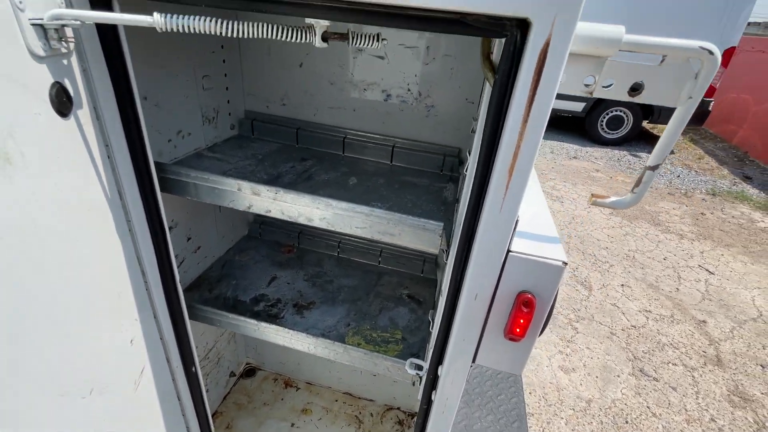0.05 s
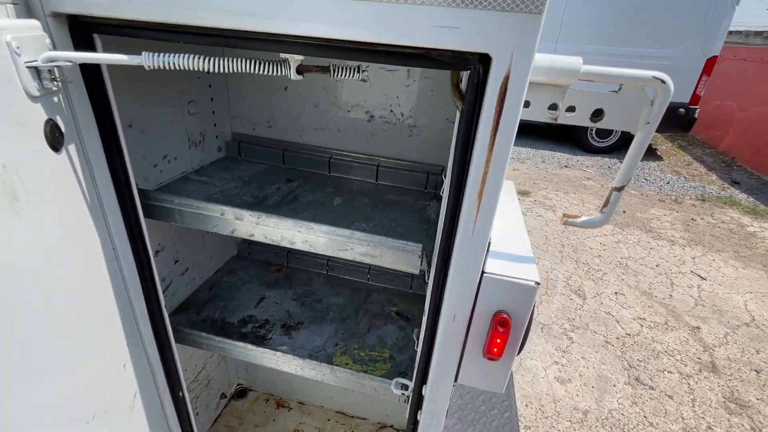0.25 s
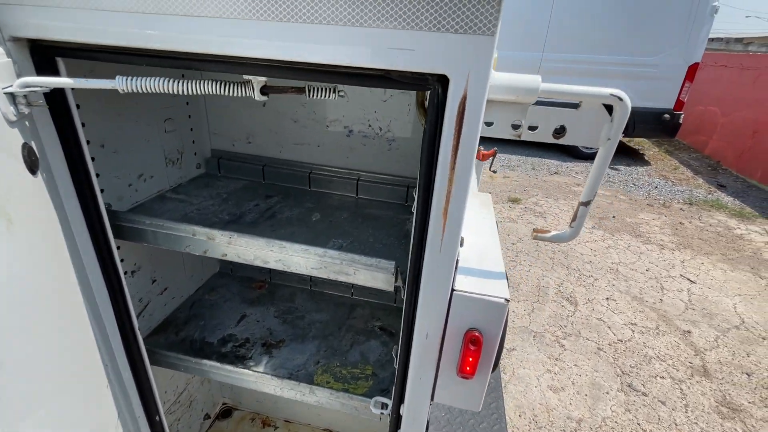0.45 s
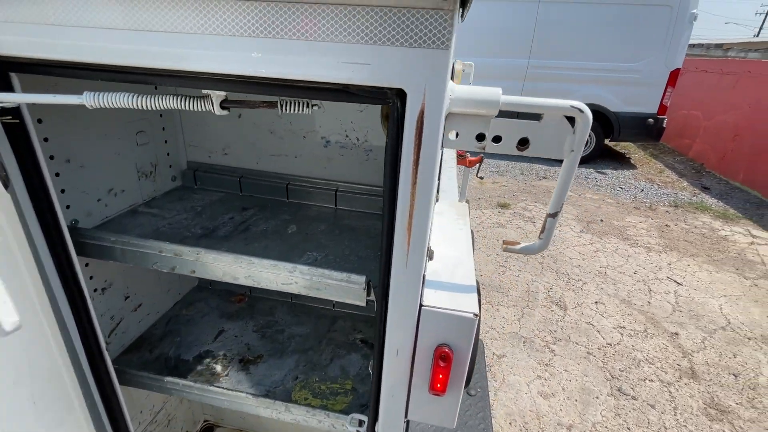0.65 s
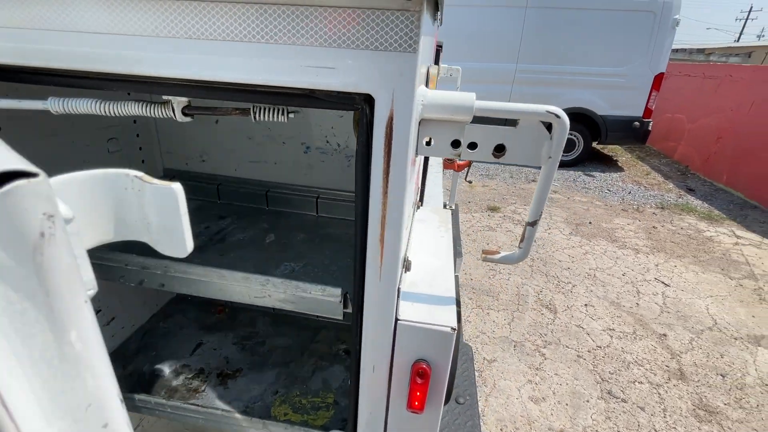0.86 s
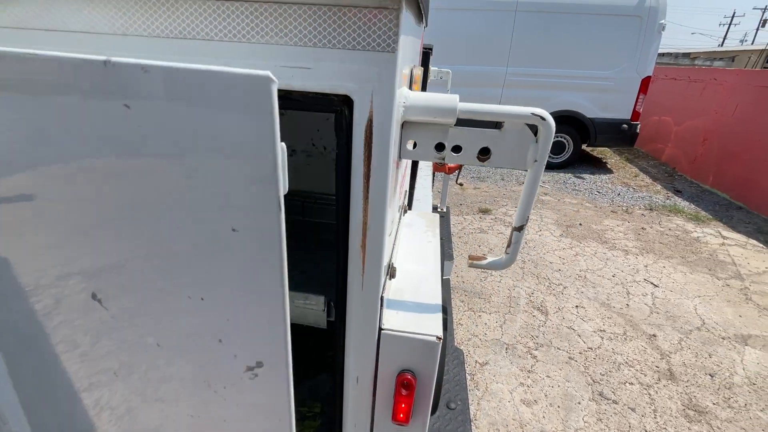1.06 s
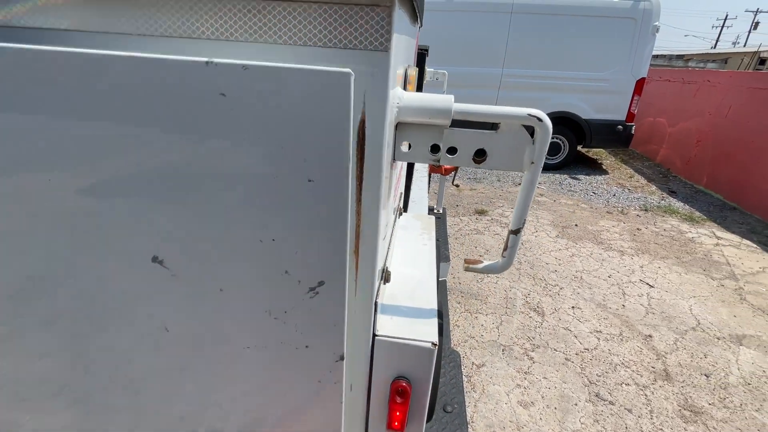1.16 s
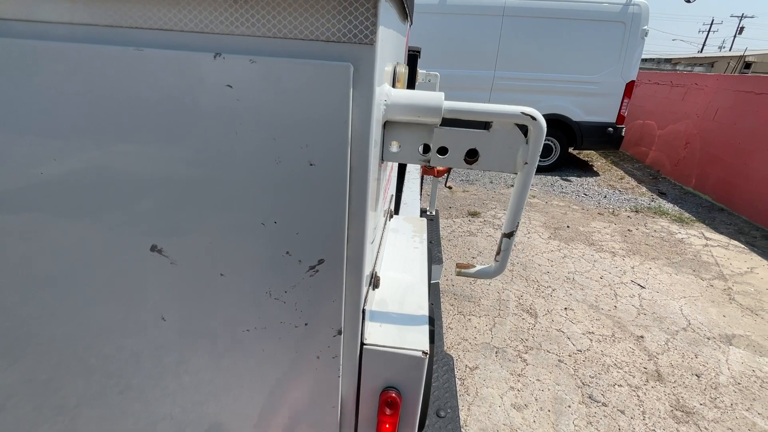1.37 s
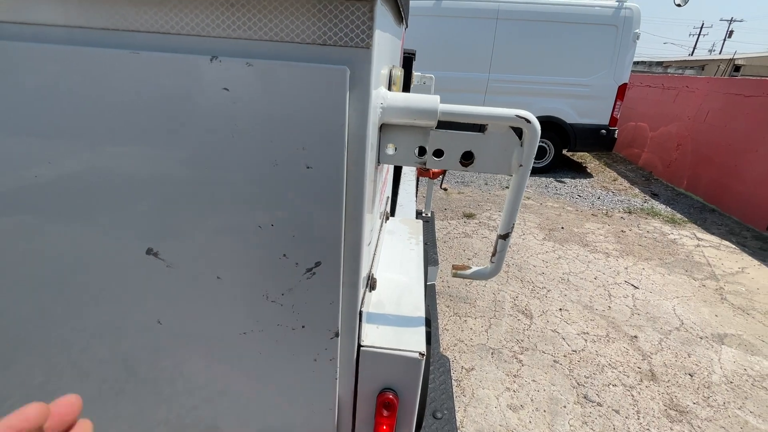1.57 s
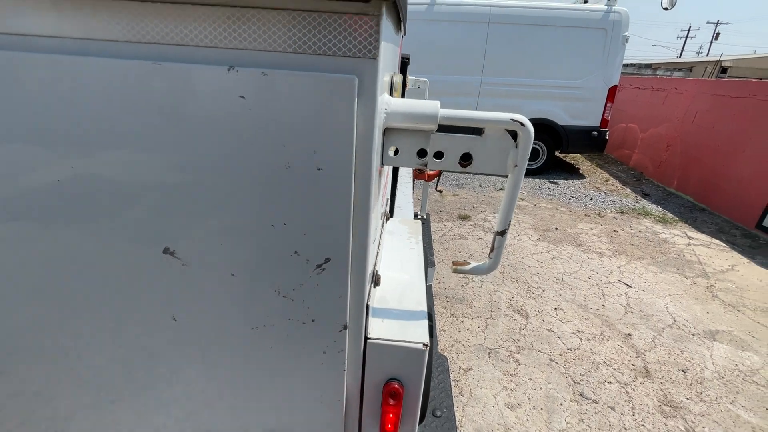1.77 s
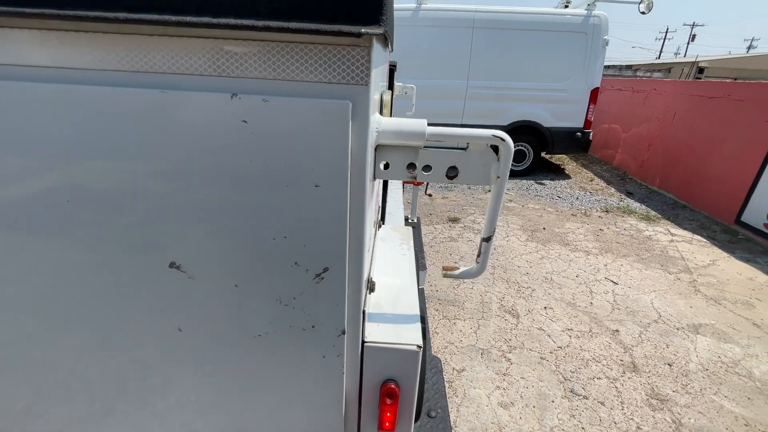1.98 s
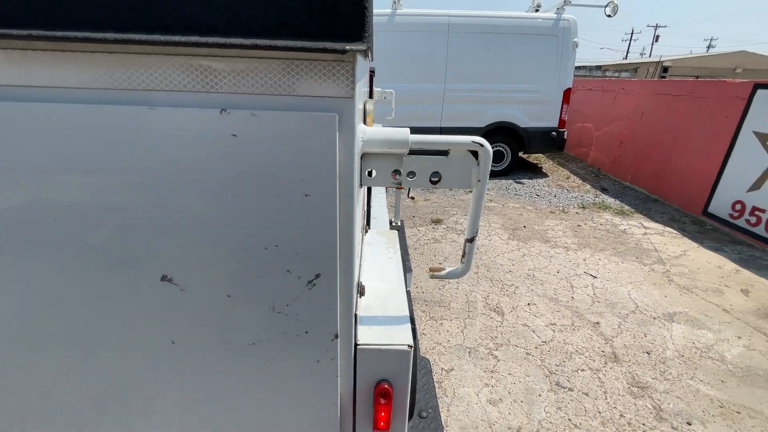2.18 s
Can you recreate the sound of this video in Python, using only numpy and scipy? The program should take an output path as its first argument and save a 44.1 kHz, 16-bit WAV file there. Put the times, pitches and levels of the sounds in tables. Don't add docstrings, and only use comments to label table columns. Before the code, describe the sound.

Metal truck-box door slam, close and loud, with latch clack and brief rattle outdoors.

```python
import sys
import numpy as np
from scipy import signal
from scipy.fft import rfft, irfft, next_fast_len
from scipy.io import wavfile
from scipy.ndimage import map_coordinates

SR = 44100
rng = np.random.default_rng(int(sys.argv[2]) if len(sys.argv) > 2 else 0)


def digitize_waveform(pressure):
    field = np.atleast_2d(pressure).T
    bounded = np.clip(field, -1, 1)
    quanta = np.round(bounded * 32767).astype(np.int16)
    wavfile.write(sys.argv[1], SR, quanta)


def voltage_ratio(decibels):
    exponent = np.asarray(decibels, float) / 20
    return 10 ** exponent


N = 98210


def unit(x):
    return x / np.sqrt(np.mean(x ** 2) + 1e-20)


def along(points, hz):
    f, v = np.transpose(points)
    return np.interp(np.log(hz + 1), np.log(f + 1), v)


def filtered(x, response):
    m = next_fast_len(len(x) + 8192)
    spectrum = rfft(x, m) * response(np.fft.rfftfreq(m, 1 / SR))
    return irfft(spectrum, m)[:len(x)]


def noise(response, size=N):
    return unit(filtered(rng.standard_normal(size), response))


def wobble(rate):
    knots = rng.standard_normal(int(N * rate / SR) + 4)
    return map_coordinates(knots, [np.arange(N) * rate / SR])


def add(track, s, x):
    part = track[round(s * SR):][:len(x)]
    part += x[:len(part)]


# time in seconds, level in dB.
TRAFFIC_LEVEL = [(0.0, -54), (0.55, -49), (1.2, -51), (1.32, -54.5), (1.53, -51), (2.23, -50)]
# frequency in Hz, level in dB.
HUM_TONE = [(120, -35), (200, -5.5), (294, -4.5), (400, -7.5), (800, -7), (1870, -16.5), (5700, -27.5),
            (16000, -33)]
# frequency in Hz, level in dB per Hz.
RUMBLE_TONE = [(8.8, -17), (15, 2.5), (123, -4), (189, -13), (225, -31.5), (255, -10), (300, -20.5),
               (390, -49), (660, -120)]


def far_traffic():
    t = np.arange(N) / SR
    s, db = np.transpose(TRAFFIC_LEVEL)
    hum_db = np.interp(t, s, db) + 1 + 0.6 * wobble(6)
    hum = voltage_ratio(hum_db) * noise(lambda hz: voltage_ratio(along(HUM_TONE, hz)))
    rumble_db = -45.5 - t + 0.3 * wobble(9.1) + 1.1 * wobble(14.2)
    rumble = voltage_ratio(rumble_db) * noise(lambda hz: voltage_ratio(along(RUMBLE_TONE, hz)))
    return hum + rumble


# start in
# seconds, peak in dB, centre in Hz, width in octaves, time to die by 60 dB in seconds.
TICKS = [(.0433, -50, 9000, 1, .01), (.341, -55, 6800, .2, .03), (.341, -54, 14500, .25, .04),
         (.4, -42, 290, .3, .15), (.437, -53, 8000, .6, .06), (.437, -49, 14800, .2, .07),
         (.5023, -42, 6500, .6, .006), (.288, -54, 7400, .08, .03), (.303, -54, 8800, .15, .02),
         (.84, -57, 15000, .1, .02), (.908, -51, 12500, .4, .01), (.9692, -43, 8500, .45, .008),
         (1.1438, -45, 6500, .5, .012), (1.3906, -50, 3700, .1, .02), (1.46, -56, 8500, .2, .01),
         (1.5168, -51, 4500, .1, .015), (1.522, -51, 9200, .2, .012), (1.517, -48, 2400, .15, .015),
         (1.535, -45, 2300, .2, .015), (1.537, -56, 8800, .2, .012), (1.1574, -20, 14500, .2, .015)]


def spring_ticks():
    out, t = np.zeros(N), np.arange(SR // 10) / SR
    for s, db, hz, wide, t60 in TICKS:
        click = noise(lambda f: np.exp(-(np.log2(f / hz + 1e-3) / wide) ** 2 / 2), size=len(t))
        rise = 1 - np.exp(-t * hz)
        add(out, s, voltage_ratio(db - 60 * t / t60) * rise * click)
    return out


# start, rise, hold and fall in seconds, level in dB.
RUSTLES = [
    (.08, 0.27, 0.64, 0.46, -58),
    (1.555, 0.26, .6, .5, -53),
    (0.43, 0.03, 0.21, 0.21, -55.5),
]
# centre in Hz, width in Hz, level in dB.
RUBBED = [
    [(1080, 370, 9.5), (2260, 300, 1), (3434, 240, 6.5), (4900, 1300, 0), (5980, 790, 4.5), (7640, 490, -2),
     (8650, 2600, -7), (11900, 2100, -1.5)],
    [(1895, 410, 10.5), (2330, 420, 3.5), (3620, 1340, 1.5), (5010, 1120, 2), (6070, 1440, -4),
     (8340, 1300, -7.5), (10060, 3300, -9), (12600, 2100, -10)],
    [(2340, 550, 3.5), (3490, 290, 5.5), (3960, 380, 4.5), (5100, 900, 3), (6050, 600, 3), (7700, 500, -1),
     (9200, 2300, -6), (11600, 1700, -1.5)],
]


def rustles():
    out, t = np.zeros(N), np.arange(N) / SR
    for (s, rise, hold, fall, db), peaks in zip(RUSTLES, RUBBED):
        stroke = np.interp(t, s + np.cumsum([0, rise, hold, fall]), [0, 1, 1, 0])
        grit = rng.standard_normal(N) * voltage_ratio(1.1 * wobble(300) + 0.3 * wobble(8.7))

        def surface(f):
            power = sum(voltage_ratio(2 * g) / (1 + (2 * (f - c) / w) ** 2) ** 2 for c, w, g in peaks)
            return np.sqrt(power)

        out += voltage_ratio(db) * stroke * unit(filtered(grit, surface))
    return out


# start in seconds, level in dB, scrape hold in seconds,
# time to die by 60 dB in seconds, tilt toward treble in dB per octave.
CONTACTS = [(1.157, -21, 0.0019, 0.014, 9), (1.158, -17.5, 0.004, 0.042, 1),
            (1.1696, -6.5, 0.00072, 0.023, -1.5), (1.1721, -10.5, 0.0026, 0.01, -2),
            (1.1774, -15.5, 0.0037, .015, -6), (1.18, -20.5, 0.0021, 0.094, -3),
            (1.193, -21, 0.0016, 0.024, -11), (1.202, -11.5, 0.0013, .012, 0.5),
            (1.2052, -18.5, 0.0025, 0.041, -1), (1.222, -34, .003, .03, 4),
            (1.247, -35.5, .004, 0.057, -7.5), (1.287, -54, .02, .08, -1), (1.309, -44.5, .01, .08, -7)]
# frequency in Hz, level in dB per Hz.
CLATTER = [(240, -33), (500, -9.5), (1300, -5.5), (2300, -8.5), (3200, -17), (4400, -9.5), (9000, -9.5),
           (16000, -18)]


def latch():
    out, t = np.zeros(N), np.arange(SR // 4) / SR
    for s, db, hold, t60, tilt_db in CONTACTS:
        scrape = noise(lambda hz: voltage_ratio(along(CLATTER, hz) + tilt_db * np.log2(hz / 4000 + .01)), size=len(t))
        rise = 1 - np.exp(-t / 0.00037)
        add(out, s, voltage_ratio(db - 60 * np.maximum(t - hold, 0) / t60) * rise * scrape)
    return out


# start in seconds, pitch in Hz, level in dB,
# time to die by 60 dB in seconds.
PINGS = [(1.159, 4250, -21, 0.03), (1.162, 6300, -28, .03), (1.1575, 2500, -23.5, .03),
         (1.158, 766, -16, 0.024), (1.1605, 10160, -15.5, 0.033), (1.1687, 8640, -17, 0.015),
         (1.204, 3300, -30.5, 0.04), (1.171, 1250, -9, 0.033), (1.17, 1600, -24, 0.046),
         (1.171, 2458, -23, 0.03), (1.171, 14900, -8, 0.018), (1.192, 8800, -27, 0.034),
         (1.174, 6380, -11.5, 0.016), (1.179, 11000, -28, 0.057), (1.202, 8730, -5, 0.012),
         (1.2025, 14700, -15, .02), (1.21, 14670, -42.5, .16), (1.203, 1230, -17, 0.052),
         (1.204, 10250, -23.5, 0.072), (1.203, 9500, -34.5, 0.12), (1.28, 8650, -55, .1),
         (1.18, 14700, -32, .1), (1.206, 4350, -30, 0.063), (1.168, 990, -28, .03), (1.29, 9900, -57, .15)]


def pings():
    out, t = np.zeros(N), np.arange(SR // 4) / SR
    for s, hz, db, t60 in PINGS:
        waver = 0.36 * noise(lambda f: 1 / (1 + (f / (0.034 * hz)) ** 2), size=len(t))
        ring = np.sin(2 * np.pi * hz * t + waver)
        rise = 1 - np.exp(-t / 0.00022)
        add(out, s, voltage_ratio(db - 60 * t / t60) * rise * ring)
    return out


# start in seconds, level in dB, swell in seconds.
BLOWS = [
    (1.158, -30, 0.0018),
    (1.171, -19, 0.0023),
    (1.19, -27.5, 0.0027),
    (1.2013, -23.5, 0.0019),
    (1.245, -37.5, 0.0025),
]
# start in seconds, pitch in Hz,
# level in dB, swell in seconds, time to die by 60 dB in seconds.
PANEL_MODES = [(1.19, 95, -22, .008, 0.22), (1.24, 119, -28, .02, .6), (1.18, 160, -29.5, 0.0078, .35),
               (1.39, 160, -38, .02, .8), (1.172, 207, -23, .004, 0.21), (1.225, 203, -23.5, 0.02, 0.28),
               (1.172, 274, -15.5, 0.012, 0.27), (1.245, 274, -26, .015, 0.43),
               (1.175, 312, -26.5, 0.0083, 0.66), (1.318, 306, -27.5, 0.0046, 0.24),
               (1.17, 358, -18.5, 0.0044, 0.18), (1.2, 390, -22, 0.01, 0.24), (1.33, 395, -36, .015, 0.54),
               (1.171, 480, -19, 0.0034, .15), (1.24, 506, -21, 0.014, 0.23), (1.325, 510, -36, 0.017, .7),
               (1.34, 450, -38.5, .01, 0.56), (1.17, 542, -19.5, .006, 0.28), (1.27, 565, -32.5, .01, 0.61),
               (1.175, 660, -30.5, 0.011, 0.33), (1.205, 718, -30, 0.012, 0.3), (1.2, 860, -36.5, .01, .5),
               (1.168, 865, -15, .002, 0.083), (1.158, 690, -25, .003, 0.14), (1.2, 890, -28.5, .005, 0.2),
               (1.23, 930, -38, 0.011, .4), (1.33, 90, -37, .01, 1), (1.386, 310, -40.5, .01, 0.49)]
# frequency in Hz, level in dB.
WASH_TONE = [(35, -32), (70, -1.5), (500, -6.5), (1400, -15.5), (2000, -20.5), (2900, -28.5), (9500, -25),
             (16000, -33)]
# frequency in Hz, time to die by 60 dB in seconds.
WASH_T60 = [(60, 0.68), (300, 0.94), (700, 0.48), (2000, 0.45), (6000, 0.37), (11000, 0.25), (15000, 0.25)]


def panels():
    out, t = np.zeros(N), np.arange(SR) / SR
    waver_hz = 20
    for s, hz, db, swell, t60 in PANEL_MODES:
        turn = 2 * np.pi * (hz * t + rng.random()) + 0.65 * wobble(waver_hz)[:SR]
        level_db = db - 60 * t / t60 + 2 * wobble(waver_hz)[:SR]
        add(out, s, voltage_ratio(level_db) * (1 - np.exp(-t / swell)) * np.sin(turn))
    for s, db, swell in BLOWS:
        rush = noise(lambda f: voltage_ratio(along(WASH_TONE, f)), size=SR)
        hz, frames, z = signal.stft(rush, SR, nperseg=512)
        decay = voltage_ratio(-60 * frames / along(WASH_T60, hz)[:, None])
        wash = signal.istft(z * decay, SR, nperseg=512)[1][:SR]
        add(out, s, voltage_ratio(db - 3) * (1 - np.exp(-t / swell)) * wash)
    seat_s, seat_fall_s = 1.298, 0.014
    seal_db = np.interp(np.arange(N) / SR, seat_s + seat_fall_s * np.arange(3), [0, -11, -2])
    lows = filtered(out, lambda f: 1 / (1 + (f / 613) ** 4))
    return out - lows * (1 - voltage_ratio(seal_db))


def air_push():
    t = np.arange(N) / SR - 1.1755
    width_s, push_hz, start_phase = 0.005, 78, 2.8
    puff = np.exp(-(t / width_s) ** 2 / 2)
    return voltage_ratio(-9) * puff * np.sin(2 * np.pi * push_hz * t + start_phase)


def yard_echoes(x):
    delay_s, hold_s, t60_s = 0.034, 0.11, 0.22
    t = np.arange(SR // 2) / SR - delay_s
    fade_db = -60 * np.maximum(t - hold_s, 0) / t60_s - 50 * t
    tail = rng.standard_normal(len(t)) * (t > 0) * voltage_ratio(fade_db)
    dull = filtered(x, lambda hz: 1 / (1 + (hz / 12000) ** 4))
    return voltage_ratio(-30) * signal.fftconvolve(dull, tail / np.linalg.norm(tail))[:N]


def scene():
    background = far_traffic() + spring_ticks() + rustles()
    metal = latch() + pings()
    faint = background + panels() + yard_echoes(metal)
    faint = filtered(faint, lambda hz: hz < 15800)
    return (metal + air_push() + faint)[None]


# frequency in Hz, level in dB.
MIC = [(20, 1.5), (10400, -1.5), (11100, -9.5), (13600, -11), (14800, -5), (15500, -4), (16600, -45)]


def microphone(x):
    heard = filtered(x, lambda hz: voltage_ratio(along(MIC, hz)))
    return heard / (1 + np.abs(heard / 1.03) ** 6) ** (1 / 6)


def top_cut(x):
    return signal.sosfilt(signal.butter(12, 16810, fs=SR, output="sos"), x)


def record(dry):
    mix = filtered(microphone(dry[0]), lambda hz: hz < 16800)
    return top_cut(mix[None])


dry = scene()
out = record(dry)
digitize_waveform(out)
```